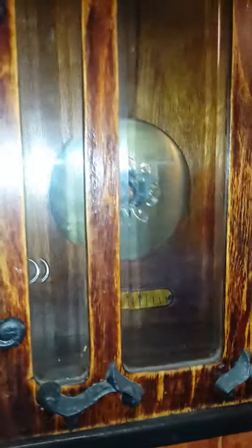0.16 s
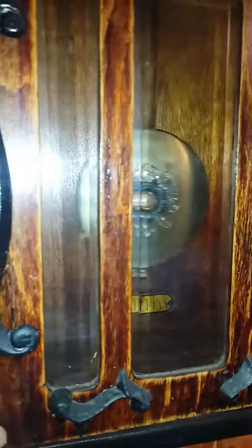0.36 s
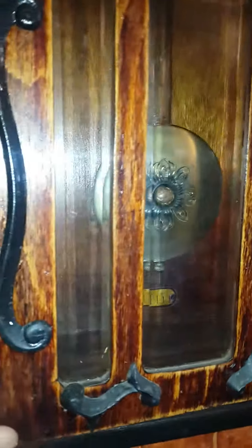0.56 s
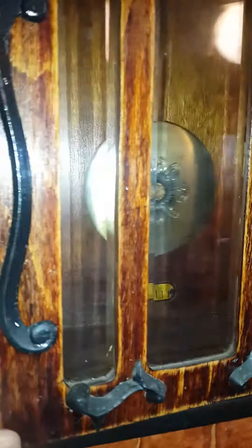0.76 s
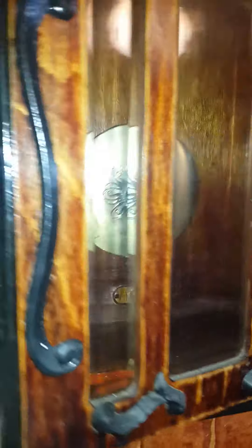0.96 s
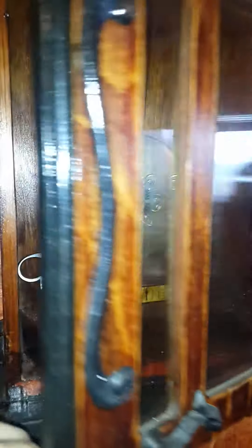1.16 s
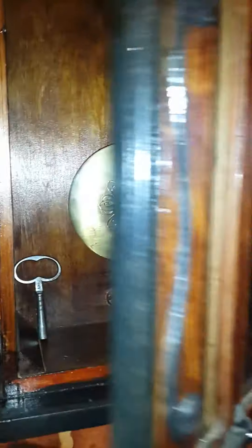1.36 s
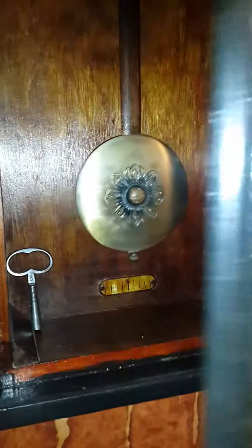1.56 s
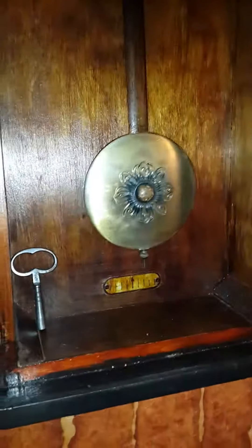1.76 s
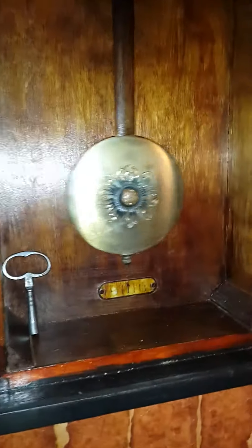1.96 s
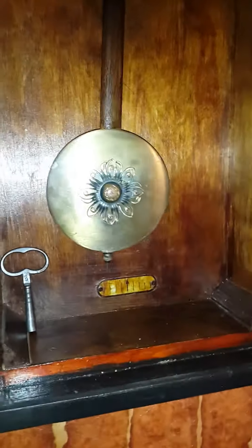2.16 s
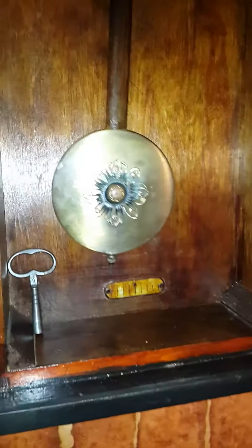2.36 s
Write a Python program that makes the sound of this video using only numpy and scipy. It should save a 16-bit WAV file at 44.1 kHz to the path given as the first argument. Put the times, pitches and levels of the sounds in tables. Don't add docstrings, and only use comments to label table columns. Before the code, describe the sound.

Close phone capture of a wall clock's steady tick-tock, first dull, later sharper once the case is open; the door catch snaps loudly, glass chatters, hinges rub and bump faintly, over soft hiss and hum in a quiet room.

```python
import sys
import numpy as np
from scipy import signal
from scipy.fft import rfft, irfft, next_fast_len
from scipy.io import wavfile
from scipy.ndimage import map_coordinates

SR = 44100
rng = np.random.default_rng(int(sys.argv[2]) if len(sys.argv) > 2 else 0)


def waveform_to_disk(signal):
    frames = np.transpose(np.atleast_2d(signal))
    scaled = np.clip(frames, -1, 1) * 32767
    samples = np.round(scaled).astype(np.int16)
    wavfile.write(sys.argv[1], SR, samples)


def volts(x):
    e = np.asarray(x, float) / 20
    return 10 ** e


N = 105840
PAD = SR // 5

# [t/s, level/dB, crack/dB, spring ring/dB, board/dB]
TICKS = [
    (.555, -44, -2, -1.5, 2),
    (1.6985, -40, 3.5, -17.5, -6.5),
]
# [t/s, level/dB, crack/dB, spring ring/dB, board/dB]
TOCKS = [
    (-.008, -48, -9, -4, 6),
    (1.143, -44, -0.5, -17, -1),
    (2.291, -44, 5.5, -16, 1.5),
]
# [delay/s, level/dB]
CONTACTS = [
    (0, 5.5),
    (.0035, -7),
    (.008, 3.5),
    (.018, -13.5),
    (.031, -16),
]
# [f/Hz, level/dB, t60/s]
TICK_MODES = [(535, -3.5, 0.26), (550, -10, .12), (1613, -15.5, 0.18), (2098, -10, 0.18), (2207, -4, .17),
              (2290, -9, 0.054), (2577, -3, 0.1), (5760, -21, 0.058), (6467, -0.5, 0.069),
              (7180, -11, 0.09)]
# [f/Hz, level/dB, t60/s]
TOCK_MODES = [(540, -8.5, 0.26), (580, -7, 0.21), (831, -11.5, 0.11), (1906, -11.5, 0.27), (2074, -5, 0.18),
              (2188, -3.5, 0.094), (2574, -0.5, 0.066), (2932, -3.5, 0.051), (5210, -6.5, 0.031),
              (5860, -3, 0.075), (6140, -15, 0.1), (6310, 3.5, 0.094)]
# [f/Hz, level/dB, t60/s]
SHARP_MODES = [(4510, -17.5, 0.056), (4900, -6.5, 0.037)]
# [f/Hz, level/dB]
CLATTER_SPECTRUM = [(240, -56), (400, -18), (560, -1), (1150, -9.5), (2150, -1.5), (3250, -16),
                    (4200, -15.5), (5500, -9), (6480, -4.5), (7600, -26.5), (14100, -27), (15500, -30)]
# [f/Hz, level/dB]
CRACK_SPECTRUM = [(1500, -29), (3000, 0.5), (5000, 8.5), (6500, 13.5), (7500, -8.5), (9000, -1), (12500, 0),
                  (15500, -22)]
# [f/Hz, level/dB]
SLIDE_SPECTRUM = [(410, -30), (700, -10), (839, -22), (1020, -7.5), (1250, -11), (1990, -7.5),
                  (4040, -24.5), (5680, -15), (9000, -27), (11700, -40), (19800, -120)]

# [f/Hz, level/dB, t60/s]
CASE_MODES = [(95, -18, 0.85), (142, -1, 0.23), (176.8, -7.5, 0.69), (199.5, -2, 0.51), (284.8, -3, 0.35),
              (317, -3.5, 0.38), (389, -5, 0.13), (450.5, -13.5, 0.51), (499, -18, 0.68),
              (529.5, -6.5, 0.3), (590, -14.5, 0.48), (710, -20, 0.37), (842, 0.5, 0.14), (861, -18, 0.18)]
# [t/s, level/dB, favoured f/Hz, share
# of free ringing, thud/dB]
KNOCKS = [(.217, -34.5, 474, 0.7, 3.5), (.218, -34, 157, 1.5, -4.5), (.227, -27, 185, 0.85, -2),
          (.255, -41, 396, 0.9, -2.5), (.296, -43, 410, 0.58, -18), (.323, -40, 178, 0.69, -4),
          (.502, -40.5, 208, 0.12, -25), (.893, -45, 426, 0.36, -3), (.903, -50.5, 550, 0.7, -3),
          (.93, -62, 603, 0.5, -12), (1, -62, 189, 0.41, 10.5), (1.146, -56, 285, 0.67, -22),
          (1.387, -41.5, 220, 0.22, -5), (1.396, -43, 253, 0.89, -9), (1.414, -48.5, 250, 0.92, -15),
          (1.413, -53, 545, 1.24, -9), (1.426, -45, 189, 0.34, -23), (1.475, -59.5, 194, 0.14, 15.5),
          (1.516, -57, 197.3, 0.14, -7), (1.609, -57, 213, 9.6, -17)]
# [f/Hz, level/dB]
THUD_SPECTRUM = [(60, -38), (130, 2), (850, 7), (1300, 1), (4000, -30)]

# [t/s, rise/s, hold/s, t60/s, level/dB]
RUBS = [
    (0.2161, 0.00035, 0.00077, 0.005, -34),
    (.221, 0.0012, 0.016, 0.37, -45),
    (0.2547, 0.00021, 0.0028, 0.0096, -37.5),
    (.256, 0.0035, 0.011, 0.34, -43),
]
# [f/Hz, level/dB]
RUB_SPECTRUM = [(530, 3), (900, -5.5), (1330, -7), (2720, -2.5), (3340, -6.5), (3580, -7.5), (3890, -9),
                (5500, -3), (15500, -22)]
# [t/s, rise/s, hold/s, t60/s, level/dB]
HINGE_RUBS = [
    (0.502, 0.0069, 0.0077, 0.11, -78),
    (0.763, 0.11, 0.025, 0.037, -63),
    (1.397, 0.01, 0.0054, 0.15, -58),
    (1.429, 0.0076, 0.023, 0.32, -67),
    (1.56, 0.005, 0.0064, 0.32, -60),
]
# [f/Hz, level/dB]
HINGE_SPECTRUM = [(590, -34), (1000, -8), (1480, -13), (2180, -7.5), (3910, -13.5), (6050, -2),
                  (7110, -4.5), (8160, -16.5), (15500, -28)]
# [t/s, rise/s, hold/s, t60/s, level/dB]
SCRAPES = [
    (0.1744, 0.0011, 0.0019, 0.0056, -44.5),
    (.178, 0.0033, 0.027, 0.033, -49),
]
# [f/Hz, level/dB]
CATCH_SPECTRUM = [(600, -42), (1200, -8), (2600, -7.5), (3600, -7), (5200, -0.5), (6500, -3.5),
                  (8200, -13.5), (15500, -28)]
# [t/s, level/dB]
CHATTER = [(0.2163, -45), (0.228, -51), (0.2538, -42), (0.2592, -43.5), (0.2646, -41.5), (0.269, -37),
           (.274, -47), (0.28, -51), (0.286, -39), (.296, -51), (.305, -50), (0.323, -54), (1.569, -62)]
# [f/Hz, level/dB, t60/s]
PANE_MODES = [(1960, -5, 0.032), (2491, -6.5, 0.059), (2880, -4, 0.06), (4520, -3, .04), (5210, -4, .04),
              (5860, 3, 0.034), (6500, -6, 0.037), (7200, -8, 0.024)]

# [t/s, effort/dB]
STIR = [
    (0.0, -62),
    (2.3, -75),
    (2.4, -70),
]
# [f/Hz, level/dB]
HISS_SPECTRUM = [(180, -62), (300, -22), (424, 2.5), (468, -7.5), (1140, -12.5), (3810, -14), (5760, -10.5),
                 (6680, -11.5), (15500, -34)]
# [f/Hz, level/dB]
RUMBLE_SPECTRUM = [(15, -45), (25, -18.5), (102, 0.5), (167, -6.5), (184, -4.5), (287, -10.5), (316, -7.5),
                   (369, -14.5), (700, -27), (910, -80), (1540, -120)]
# [f/Hz, width/Hz, level/dB]
WHINE = [(1192, 14, -85), (5745, 70, -75), (5783, 4, -83)]
# [f/Hz, level/dB]
HUM = [(50, -66.5), (98, -68), (148, -69), (196, -72)]

# [f/Hz, likeness]
ALIKE = [(60, 0.71), (180, 0.89), (550, 0.73), (1650, -0.19), (4970, -0.66), (15000, -0.048)]
# [f/Hz, level/dB]
LEFT_OVER_RIGHT = [(60, 0.5), (150, 2), (380, 3), (950, -2.5), (2380, -1), (5980, 1.5), (15000, 12.5)]
# [f/Hz, phase/rad]
LEFT_LEADS = [(100, 0.036), (500, -0.67), (1000, -1.9), (3000, -1.38)]
# [f/Hz, t60/s]
ROOM_DECAY = [(150, 0.38), (1000, 0.28), (6000, 0.34), (14000, 0.11)]
# [f/Hz, level/dB]
SELF_NOISE_SPECTRUM = [(300, 2), (3000, 1.5), (9000, -6.5), (15000, 0.5), (16000, -40)]

WANDER_RAD = .45
HAND_DAMPS_S = .435


def unit(x):
    return x / np.sqrt(np.mean(x ** 2) + 1e-20)


def along(points, hz):
    f, v = np.transpose(points)
    return np.interp(np.log(hz + 1), np.log(f + 1), v)


def wobble(knots_per_s):
    knots = rng.standard_normal(int(N * knots_per_s / SR) + 4)
    return map_coordinates(knots, [np.arange(N) * knots_per_s / SR])


def filtered(x, response):
    size = x.shape[-1]
    m = next_fast_len(size + 8192)
    return irfft(rfft(x, m) * response(np.fft.rfftfreq(m, 1 / SR)), m)[..., :size]


def noise(spectrum, size):
    return unit(filtered(rng.standard_normal(size), lambda hz: volts(along(spectrum, hz))))


def stroke(t, rise_s, hold_s, t60_s):
    rise_s = max(rise_s, 1e-4)
    release = volts(-60 * np.maximum(t - rise_s - abs(hold_s), 0) / t60_s)
    return np.clip(t / rise_s, 0, 1) * release


def ring(modes, t, scatter_db, attack_s, gain=lambda hz: 1, life=1, wander_rad=0):
    out = 0
    for hz, db, t60_s in modes:
        level = gain(hz) * volts(db + scatter_db * rng.standard_normal() - 60 * t / (t60_s * life))
        drift = wander_rad * np.interp(t, np.linspace(0, t[-1], num=60), rng.standard_normal(size=60))
        out = out + level * np.sin(2 * np.pi * hz * t + drift)
    return out * (1 - np.exp(-t / attack_s))


def add(track, s, sound):
    track[PAD + round(s * SR):][:len(sound)] += sound


def paired(pair):
    def mid_side(hz):
        turn = np.arccos(np.clip(along(ALIKE, hz), 0, 1)) / 2
        return np.array([np.cos(turn), np.sin(turn)])

    mid, side = filtered(pair, mid_side)
    both = np.array([mid + side, mid - side])
    return filtered(both, lambda hz: volts([[.5], [-.5]] * along(LEFT_OVER_RIGHT, hz)))


def ports(x, room_db):
    near_echo_db, near_echo_t60_s, near_echo_low_hz = -3, .015, 700
    half = np.array([[.5], [-.5]])

    def port_response(hz):
        return volts(half * along(LEFT_OVER_RIGHT, hz)) * np.exp(1j * half * along(LEFT_LEADS, hz))

    direct = filtered(x, port_response)
    size = SR // 2
    hz, t, z = signal.stft(rng.standard_normal((2, size)), SR, nperseg=256)
    decay = volts(-60 * t / along(ROOM_DECAY, hz)[:, None])
    late = signal.istft(z * decay, SR, nperseg=256)[1][:, :size]
    near = rng.standard_normal((2, size)) * volts(-60 * np.arange(size) / SR / near_echo_t60_s)
    near = filtered(near, lambda f: 1j * f / (near_echo_low_hz + 1j * f))
    late = volts(room_db) * late / np.linalg.norm(late[0])
    near = volts(near_echo_db) * near / np.linalg.norm(near[0])
    delayed = np.pad(x, (SR // 1000, 0))[None]
    wet = signal.fftconvolve(delayed, paired(late + near), axes=1)[:, :len(x)]
    return (direct + wet)[:, PAD:PAD + N]


def pallet_contact(t, modes, crack_db, spring_db, board_level):
    body_hz = 1200
    sharp = [(hz, db + crack_db, t60_s) for hz, db, t60_s in modes[1]]
    spring = [(6385, spring_db, .17)]
    brass = ring(modes[0] + sharp + spring, t, scatter_db=2.5, attack_s=.0005,
                 gain=lambda hz: 1 if hz > body_hz else board_level, wander_rad=WANDER_RAD)
    clatter = volts(-6.5) * stroke(t, .0051, 0, .17) * noise(CLATTER_SPECTRUM, len(t))
    crack = volts(crack_db) * stroke(t, .00068, 0, .014) * noise(CRACK_SPECTRUM, len(t))
    return brass + clatter + crack


def escapement():
    body_repeat = .3
    tick_modes = TICK_MODES, SHARP_MODES + [(965, -5, .1)]
    tock_modes = TOCK_MODES, SHARP_MODES + [(5200, -8, .055)]
    # offset/s, rise/s, t60/s, level/dB
    sides = [(TICKS, tick_modes, (.045, .025, .22, -2.5)),
             (TOCKS, tock_modes, (-.073, .006, .3, -9))]
    t, out = np.arange(SR // 3) / SR, 0
    for beats, modes, (lag_s, rise_s, t60_s, slide_db) in sides:
        for s, db, crack_db, spring_db, board_level in beats:
            track = np.zeros(N + SR)
            for delay_s, hit_db in CONTACTS:
                board_gain = volts(board_level) * (body_repeat if delay_s else 1)
                hit = pallet_contact(t, modes, crack_db, spring_db, board_gain)
                add(track, s + delay_s, volts(db + hit_db - 11) * hit)
            slide = stroke(t, rise_s, .0017, t60_s) * noise(SLIDE_SPECTRUM, len(t))
            add(track, s + lag_s, volts(db + slide_db - crack_db / 2 - 10) * slide)
            out = out + ports(track, room_db=-4)
    return out


def door_knocks():
    t, track = np.arange(SR * 3 // 4) / SR, np.zeros(N + SR)
    for s, db, hz, life, thud_db in KNOCKS:
        early = s < HAND_DAMPS_S
        octaves, attack_s = (.93, .00058) if early else (.4, .002)

        def favour(f):
            return 1 / (1 + (np.log2((f + 1) / hz) / octaves) ** 2) ** 2

        thud = unit(filtered(noise(THUD_SPECTRUM, len(t)), favour)) * stroke(t, .0013, 0, .37 * life)
        wood = ring(CASE_MODES, t, scatter_db=2, attack_s=attack_s, gain=favour, life=life)
        damp_db = -10 * np.clip((s + t - HAND_DAMPS_S) / .0045, 0, 1) * early
        add(track, s, volts(db + damp_db - 1) * (wood + volts(thud_db - 6) * thud))
    return ports(track, room_db=-17)


def door_rubs():
    grains_per_s, grain_db = 900, 3.5
    snap_s = .0045
    t, track = np.arange(SR // 2) / SR, np.zeros(N + SR)
    for strokes, spectrum in [(RUBS, RUB_SPECTRUM), (HINGE_RUBS, HINGE_SPECTRUM), (SCRAPES, CATCH_SPECTRUM)]:
        for s, rise_s, hold_s, t60_s, db in strokes:
            grain = volts(grain_db * (hold_s > snap_s) * wobble(grains_per_s)[:len(t)])
            friction = unit(grain * noise(spectrum, len(t)))
            add(track, s, volts(db - .5) * stroke(t, rise_s, hold_s, t60_s) * friction)
    for s, db in CHATTER:
        glass = ring(PANE_MODES, t[:SR // 8], scatter_db=4, attack_s=.00051, wander_rad=WANDER_RAD)
        add(track, s, volts(db - 6.5) * glass)
    return ports(track, room_db=-3)


def room_tone():
    t = np.arange(N) / SR
    stir_db = np.interp(t, *np.transpose(STIR))
    stir_db = stir_db - stir_db.mean()
    hiss_db = -68 + stir_db + 1.74 * wobble(12.1)
    hiss = volts(hiss_db) * paired(noise(HISS_SPECTRUM, (2, N)))
    rumble_db = -66.5 + .65 * stir_db + 1.2 * wobble(14)
    rumble = volts(rumble_db) * paired(noise(RUMBLE_SPECTRUM, (2, N)))
    whine = 0
    for hz, width_hz, db in WHINE:
        band = filtered(rng.standard_normal((2, N)), lambda f: 1 / (1 + ((f - hz) / width_hz) ** 2))
        whine = whine + volts(db) * unit(band)
    hum = 0
    for hz, db in HUM:
        hum = hum + volts(db + 1.5 * wobble(9)) * np.sin(2 * np.pi * hz * t + .6 * wobble(6))
    return hiss + rumble + paired(whine) + hum


def scene():
    return escapement() + door_knocks() + door_rubs() + room_tone()


def roll_off(x):
    return signal.sosfilt(signal.butter(12, 16160, fs=SR, output="sos"), x)


def record(dry):
    low_hz, top_hz = 40.8, 15900
    mix = dry + volts(-70.5) * noise(SELF_NOISE_SPECTRUM, (2, N))
    mix = filtered(mix, lambda hz: (1j * hz / (low_hz + 1j * hz)) ** 4 * (hz < top_hz))
    return roll_off(mix)


dry = scene()
out = record(dry)
waveform_to_disk(out)
```